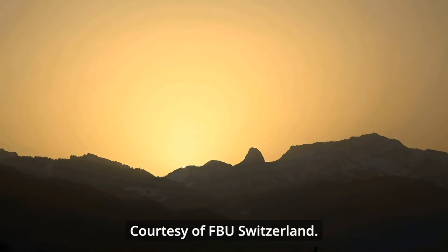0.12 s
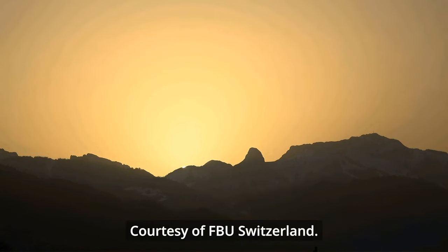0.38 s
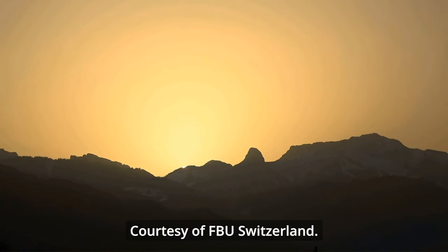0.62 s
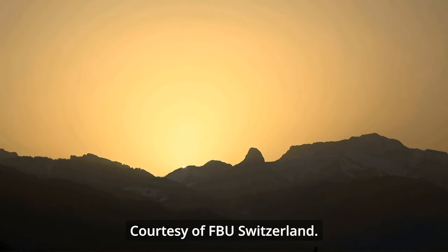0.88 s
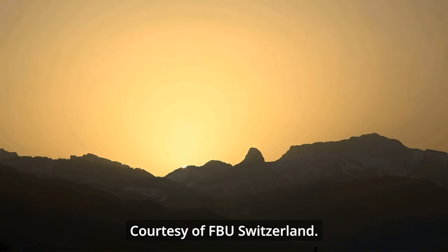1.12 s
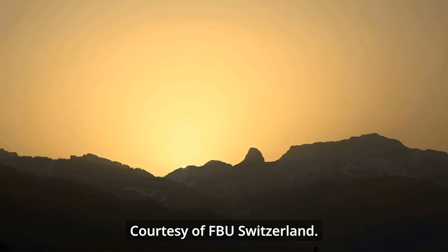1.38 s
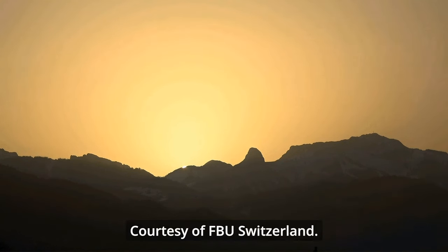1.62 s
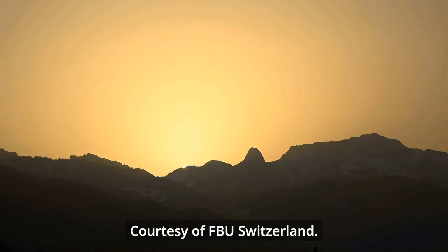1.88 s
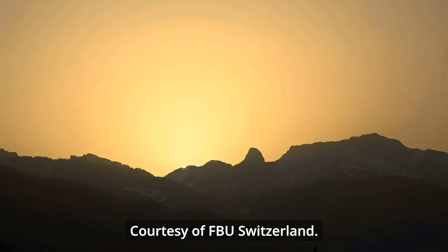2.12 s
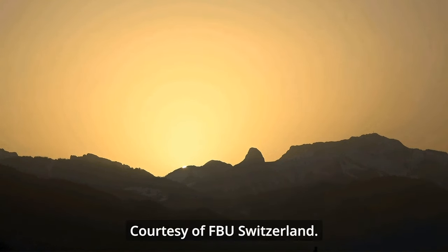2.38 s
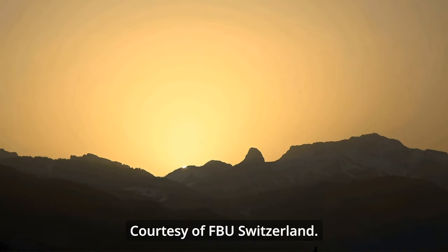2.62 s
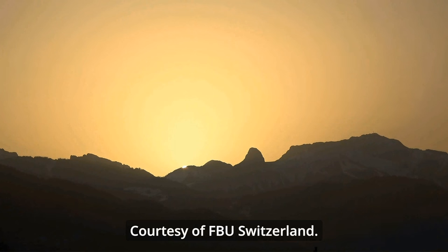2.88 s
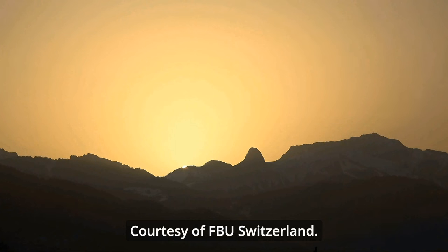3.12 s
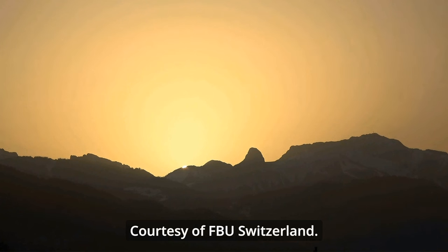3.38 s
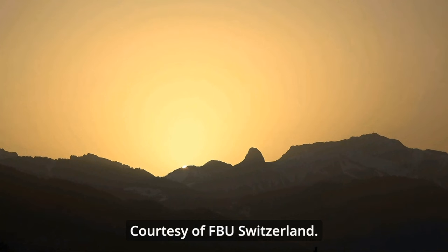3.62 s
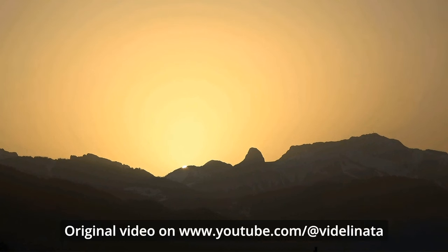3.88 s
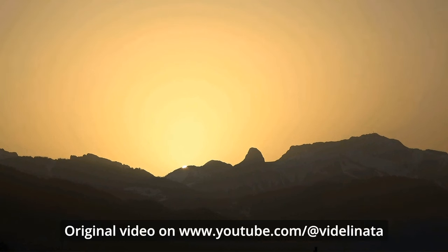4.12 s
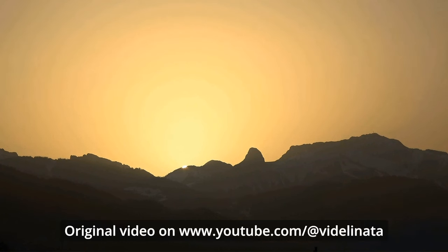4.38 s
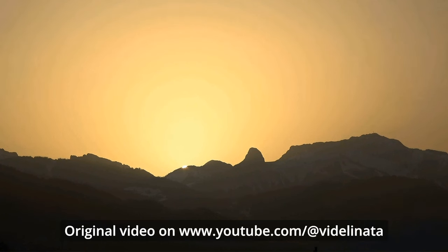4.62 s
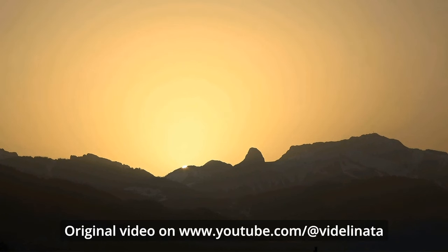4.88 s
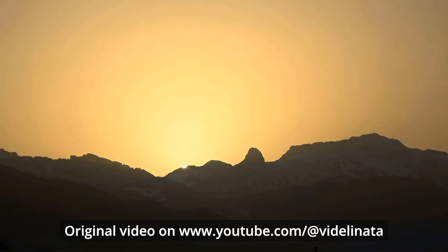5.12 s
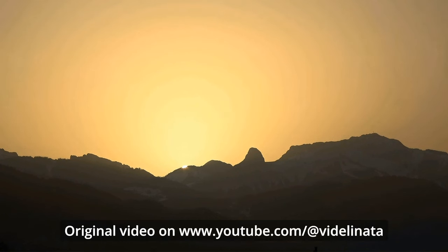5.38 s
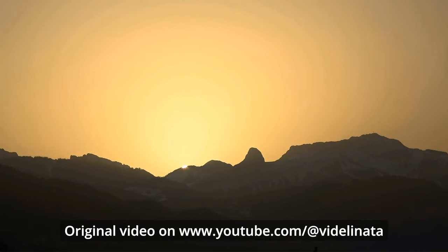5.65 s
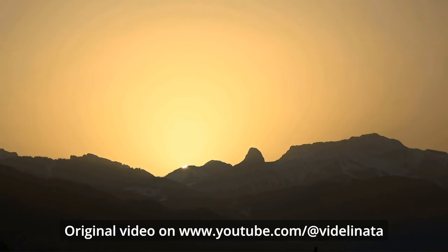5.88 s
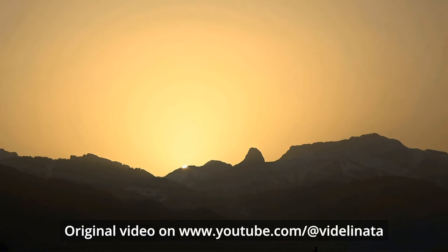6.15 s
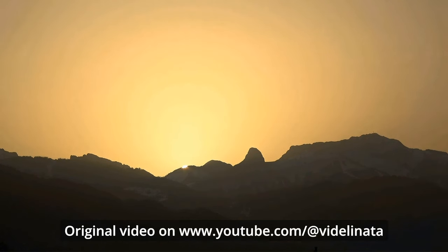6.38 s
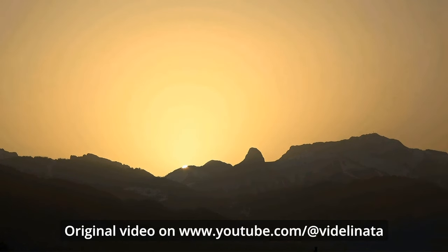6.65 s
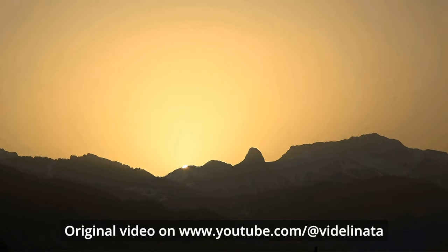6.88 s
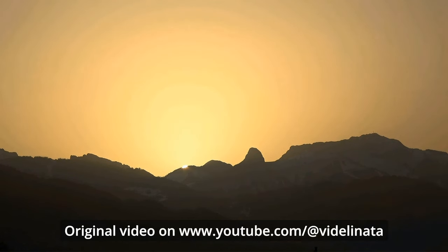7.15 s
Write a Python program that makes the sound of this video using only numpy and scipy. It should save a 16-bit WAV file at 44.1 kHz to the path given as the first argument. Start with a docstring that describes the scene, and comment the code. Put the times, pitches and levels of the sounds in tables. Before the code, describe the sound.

A dawn chorus on a wooded mountain slope, heard for about seven seconds through one microphone, the same in both channels. Strong gliding whistles around 3 kHz burst out from 0 to 0.3 s, with thin, high rippling notes and wheezing buzzes through the first second. From about 1.2 to 1.8 s the foreground is sparse, leaving faint whistles and distant birds. Around 2 s, quick chirps and notes whipping upward appear, then steep falling calls at 2.5 and 3.4 s. From 2.8 s a rich, low singer close by warbles near 2 kHz. A rapid twitter flashes by at 4.1 s. From 4.6 s whistles, smooth fluted phrases and buzzes overlap densely, with more low warbling around 6.3 s and bright whistles at 7 s. Short woodland echoes blur the calls. A hazy far chorus, faint steady low hum and gentle hiss run throughout; the birds are still singing when it stops.

```python
"""Dawn chorus on a wooded slope, seven seconds under a single microphone; gliding sine tones make the birds.
Whistles open it, with high ripples and wheezing buzzes (fast pitch swings) inside the first second or so.
Chirps, whipped hooks and steep falls come around 2 s; from 2.8 s a rich low singer close by warbles and flutes.
A twitter flashes by at 4.1 s, then whistles crowd in to the end. Throughout, trunks and ground scatter notes into
short noise tails, over a wash of far singers (random slurs), faint mains hum and hiss."""
import sys
import numpy as np
from scipy import signal
from scipy.fft import rfft, irfft, next_fast_len
from scipy.io import wavfile
from scipy.ndimage import uniform_filter1d, map_coordinates

SR = 44100
rng = np.random.default_rng(int(sys.argv[2]) if len(sys.argv) > 2 else 0)


def dump(signal):
    """Clip the signal to [-1, 1] and save it as 16-bit WAV at the path in sys.argv[1]."""
    limited = np.clip(np.atleast_2d(signal).T, -1, 1)
    pcm = np.round(limited * 32767).astype(np.int16)
    wavfile.write(sys.argv[1], SR, pcm)


def volts_from_decibels(level):
    """Turn decibel levels (scalar or array-like) into linear amplitude factors."""
    exponent = np.asarray(level, float) / 20
    return 10 ** exponent


N = 320166

# Voice levels are those of the direct sound, ahead of echoes.
# whistled notes with a freely drawn pitch and level curve, near and far, one list each: [t/s, f/Hz, level/dB]
FREE_WHISTLES = [
    [(0, 3143, -27), (0.008, 2858, -43.5), (0.035, 3193, -42.5), (0.058, 3080, -51.5), (0.066, 2820, -52)],
    [(0.119, 3350, -43), (0.138, 3643, -32), (0.152, 3536, -30), (0.162, 2820, -36.5), (0.174, 2834, -33),
     (0.198, 3480, -32.5), (0.214, 3520, -41.5), (0.223, 2853, -29.5), (0.232, 2820, -37.5),
     (0.258, 2880, -39)],
    [(1.29, 1960, -67.5), (1.37, 1895, -72), (1.46, 1994, -63.5), (1.485, 2286, -59), (1.635, 2248, -71.5)],
    [(3.683, 3100, -51), (3.687, 3800, -41), (3.69, 3620, -58), (3.694, 3920, -41), (3.7, 3030, -52),
     (3.706, 4070, -48.5), (3.74, 4220, -57)],
    [(3.86, 2960, -56), (3.876, 3250, -52), (3.883, 2830, -48.5), (3.898, 4820, -58)],
    [(4.001, 6970, -65), (4.024, 7000, -70), (4.035, 5270, -72), (4.05, 6280, -73)],
    [(4.518, 3360, -57), (4.54, 3560, -54), (4.555, 3420, -56), (4.574, 2700, -57)],
    [(4.696, 3990, -43.5), (4.705, 3700, -34.5), (4.722, 3548, -35.5), (4.85, 3520, -34.5),
     (4.91, 3570, -43.5), (4.95, 3580, -53)],
    [(4.73, 2040, -64.5), (4.75, 2580, -62), (4.795, 2780, -61)],
    [(4.866, 4500, -48.5), (4.89, 4550, -42.5), (5.088, 4210, -52.5)],
    [(4.982, 2530, -57), (5.03, 2670, -46.5), (5.056, 2650, -47.5), (5.075, 2846, -41),
     (5.111, 3030, -47.5), (5.16, 3800, -39.5)],
    [(5.17, 3640, -48), (5.22, 3780, -43.5), (5.29, 3570, -58), (5.365, 3790, -56)],
    [(5.37, 4020, -61), (5.41, 4050, -50), (5.452, 4680, -41), (5.5, 4570, -58)],
    [(5.59, 6660, -56.5), (5.635, 5780, -55.5), (5.692, 5810, -49), (5.732, 5070, -58.5),
     (5.759, 5850, -58)],
    [(5.681, 2567, -61), (5.735, 2970, -48.5), (5.775, 3730, -42), (5.8, 4170, -62), (5.825, 4220, -46.5),
     (5.85, 4065, -54), (5.875, 3570, -37.5), (5.897, 2940, -65)],
    [(6.276, 3560, -39.5), (6.288, 3810, -48.5), (6.33, 3700, -59)],
    [(6.972, 2686, -40.5), (6.99, 3286, -37.5), (7.029, 3590, -60)],
    [(7.106, 3010, -45.5), (7.125, 3324, -33), (7.16, 3364, -41.5), (7.259, 3294, -32.5)],
]
# slurs that sink a little: [start t/s, length/s, from f/Hz, to f/Hz, start level/dB]
SINKING_SLURS = [(0, 0.044, 3850, 3530, -50.5), (0.016, 0.032, 4430, 4570, -57),
                 (0.611, 0.0083, 3400, 4320, -48.5), (2.17, 0.017, 4760, 4330, -45),
                 (2.265, 0.074, 3120, 2900, -65), (2.331, 0.042, 4620, 4910, -48),
                 (2.982, 0.027, 4750, 4910, -55.5), (3.719, 0.025, 3500, 3300, -52.5),
                 (3.838, 0.014, 4700, 4820, -53.5), (4.218, 0.0056, 3780, 3400, -50),
                 (4.594, 0.019, 2650, 2810, -53.5), (4.633, 0.022, 2820, 2530, -53),
                 (4.908, 0.017, 2620, 2630, -46), (5.464, .04, 5630, 5570, -57),
                 (5.628, 0.097, 6490, 6600, -54), (5.754, 0.034, 2780, 2600, -48),
                 (6.069, 0.041, 3260, 3050, -55), (6.9, 0.013, 3230, 2920, -55),
                 (6.275, 0.054, 2720, 2540, -49)]
# slurs that swell slightly to their end: [start t/s, length/s, from f/Hz, to f/Hz, end level/dB]
SWELLING_SLURS = [(0.511, 0.0075, 3200, 4470, -53.5), (0.561, 0.0102, 3010, 4080, -54.5),
                  (.718, .018, 3520, 3890, -46.5), (1.056, 0.035, 3260, 3230, -63),
                  (1.599, 0.13, 3236, 3220, -68.5), (2.162, 0.023, 3668, 4360, -52.5),
                  (3.02, 0.026, 3410, 3280, -59), (3.776, 0.079, 2680, 2980, -60.5),
                  (3.832, 0.0086, 5600, 5500, -54), (3.9, 0.0085, 2750, 4730, -51),
                  (5.33, 0.0105, 2580, 3300, -53.5), (5.531, 0.058, 3275, 3215, -52.5),
                  (5.65, 0.091, 3350, 3090, -53), (6.151, 0.18, 1833, 1830, -60.5),
                  (6.18, 0.092, 3280, 2990, -57.5), (6.474, 0.018, 2690, 3380, -46),
                  (6.609, 0.046, 2990, 3180, -53.5), (6.731, 0.09, 3160, 3240, -55),
                  (6.763, 0.031, 4030, 3530, -54.5), (6.783, 0.03, 4030, 4290, -59),
                  (6.81, 0.05, 2780, 2604, -51.5), (6.864, 0.022, 4410, 3110, -50.5),
                  (6.963, .022, 3520, 4460, -44), (7.075, 0.047, 3590, 4330, -47.5),
                  (7.106, 0.053, 3630, 4060, -52.5)]
# quick bends that turn back to their start pitch: [start t/s, length/s, edge f/Hz, turn f/Hz, turn level/dB]
PITCH_BENDS = [(1.835, 0.013, 3290, 3790, -49.5), (2.02, 0.019, 3200, 3740, -49),
               (3.315, 0.079, 2950, 3113, -57), (4.034, 0.042, 3067, 3560, -57.5),
               (4.244, .045, 2270, 2580, -60.5), (5.501, 0.044, 2700, 2850, -55.5),
               (6.999, 0.014, 3300, 3720, -41.5)]
# steep falls that settle on a held pitch: [start t/s, from f/Hz, held f/Hz, settling time/s, peak level/dB]
STEEP_FALLS = [(2.452, 8000, 6950, 0.07, -59.5), (2.62, 6500, 5100, 0.0095, -47.5),
               (3.285, 8260, 6580, 0.044, -55.5), (3.455, 6040, 4836, 0.0062, -44.5)]
# shape of a chirp, flick up, dip, short hold: [t after start/s, ratio to base pitch, level over base/dB]
CHIRP_SHAPE = [(0, 0.75, -21), (0.0117, 1.28, 4.5), (.021, .84, -15), (.029, .99, 0.8), (0.058, 1.03, -7.5)]
# the chirps: [start t/s, base f/Hz, base level/dB]
CHIRP_CALLS = [(1.834, 2230, -41.5), (2.019, 2243, -40)]
# a low note whips up to a high one that fades: [start t/s, low note/s, low f/Hz, high f/Hz, low level/dB]
WHIPPED_HOOKS = [(2.178, 0.009, 2400, 5140, -48), (2.331, 0.022, 2480, 5840, -47.5)]
# U-shaped notes, steep strokes around a flat floor:
# [start t/s, length/s, mean edge f/Hz, floor f/Hz, level at the throat resonance/dB]
TWITTER_STROKES = [(4.053, .015, 4900, 4350, -46), (4.075, .023, 4600, 3750, -48),
                   (4.103, .024, 4350, 3200, -47), (4.131, .0285, 4350, 2850, -46),
                   (4.1615, .029, 4300, 2450, -46), (4.1925, .022, 4200, 3380, -50)]
# thin high rippling notes of a small bird: [start t/s, end t/s, start f/Hz, end f/Hz, start level/dB]
RIPPLED_NOTES = [(0.058, 0.12, 7820, 7530, -64.5), (0.138, 0.202, 7090, 6720, -57.5),
                 (0.289, 0.358, 7580, 7240, -64), (0.375, 0.447, 6600, 6480, -63.5),
                 (0.513, 0.612, 7230, 7170, -62.5), (0.78, 0.865, 6860, 6970, -64.5)]
# low warbled notes of the rich singer close by: [t/s, centre f/Hz, level/dB, pitch swing/Hz]
LOW_WARBLES = [
    [(2.797, 1510, -57, 12), (2.825, 1866, -53, 34), (2.9, 1902, -55.5, 65), (3.035, 1977, -54, 75),
     (3.056, 1970, -45, 10), (3.074, 1550, -51, 10)],
    [(3.19, 2240, -45, 19), (3.205, 2420, -42, 14), (3.243, 2315, -38, 12), (3.272, 1906, -42.5, 63),
     (3.414, 1984, -42, 55), (3.439, 1850, -45.5, 100)],
    [(3.494, 1936, -43, 40), (3.56, 1835, -40, 90), (3.595, 1710, -47, 160)],
    [(4.88, 1870, -49.5, 130), (4.936, 2022, -46, 272), (5.069, 2106, -46, 346)],
    [(5.941, 2400, -72, 150), (5.968, 2382, -47, 80), (6.03, 2337, -46, 60)],
    [(6.275, 2130, -55, 32), (6.3, 2045, -47, 31), (6.41, 1858, -44, 130), (6.47, 1892, -42.5, 61),
     (6.5, 1986, -41.5, 23.2), (6.539, 2060, -46, 35)],
    [(6.495, 1788, -48.5, 60), (6.596, 1730, -50, 59.6)],
    [(6.6, 2285, -61, 300), (6.621, 2410, -46.5, 234), (6.669, 2196, -44.5, 220)],
]
# one row for each warble: [swings per second/Hz, level flutter 0-1]
WARBLE_SWINGS = [(73.9, 1), (76.8, 0.19), (69.5, 0), (101, 0), (74, 1), (39.9, 0.34), (47.3, 0.76),
                 (68.5, 0)]
# fluted notes of the same singer: [t/s, f/Hz, level/dB]
FLUTED_NOTES = [
    [(2.801, 1055, -68), (2.84, 1235, -65), (3.019, 1291, -60.5), (3.058, 1230, -63)],
    [(4.602, 1740, -49.5), (4.663, 2070, -42.5), (4.698, 1950, -55)],
    [(4.771, 1730, -46.5), (4.84, 2077, -42.5), (4.879, 1844, -55)],
    [(5.141, 2470, -39.5), (5.2, 2126, -47.5), (5.285, 2400, -36.5), (5.33, 2330, -39), (5.359, 2170, -47)],
    [(5.69, 1600, -61.5), (5.75, 1907, -56), (5.81, 2044, -57), (5.853, 1943, -58.5), (5.889, 1405, -66)],
    [(6.031, 2350, -40), (6.072, 2556, -41), (6.16, 2408, -41)],
    [(6.671, 1944, -44.5), (6.709, 1570, -48.5), (6.75, 1654, -48.5), (6.769, 1300, -56.5)],
]
# octave of a fluted note, stronger on low notes: [first f/Hz, level/dB relative to the tone]
FLUTE_OCTAVE = [(1100, -4.5), (1500, -38)]
# In the buzzes the nominal swing is a scale that the trill multiplies.
# wheezes that change shape: [t/s, centre f/Hz, level/dB, nominal swing/Hz]
SHAPED_WHEEZES = [
    [(0.558, 4620, -50.5, 500), (0.588, 6210, -50, 403), (0.622, 6450, -49, 300), (0.65, 4540, -53, 250),
     (0.668, 4550, -47, 250), (0.68, 5460, -53, 400), (0.72, 5140, -55, 600)],
    [(0.88, 6350, -58.5, 605), (0.944, 6630, -59, 318), (1.184, 5960, -60.5, 750), (1.299, 5950, -69, 484)],
    [(5.11, 4140, -50, 200), (5.19, 4134, -46.5, 220), (5.26, 3975, -50, 250), (5.33, 3970, -64, 302)],
]
# straight wheezy slides: [start t/s, length/s, from f/Hz, to f/Hz, start level/dB, nominal swing/Hz]
WHEEZY_SLIDES = [(0.256, .185, 2558, 1985, -61.5, 265), (0.745, 0.051, 5250, 5360, -58.5, 300),
                 (0.74, .04, 4250, 3930, -51.5, 400), (2.195, 0.054, 5300, 5200, -58, 346),
                 (2.977, 0.023, 5470, 5200, -56.5, 700), (3.211, 0.054, 6320, 7940, -65, 505),
                 (3.843, 0.044, 5180, 5340, -58, 770), (5.346, 0.105, 5250, 5040, -56.5, 350),
                 (4.085, 0.052, 7800, 7850, -67.5, 120), (4.96, .14, 3620, 3735, -50, 168),
                 (4.999, 0.12, 5020, 5830, -62, 246), (5.582, 0.064, 7150, 7250, -65, 600),
                 (5.848, 0.26, 7590, 6100, -64.5, 610)]
# scratchy ticks of a far bird, one short wide wheeze each: [t/s, level/dB]
SCRATCHY_TICKS = [(5.195, -59), (5.258, -59), (5.415, -59), (4.6, -58.5), (2.455, -60)]
# short buzzes that reach a pitch, then trail off wider:
# [start t/s, time to reach/s, from f/Hz, reached f/Hz, level there/dB, nominal swing there/Hz]
SHORT_ZIPS = [(2.784, .1, 6820, 6030, -56.5, 330), (3.62, 0.12, 6840, 6000, -57, 337),
              (4.21, .035, 7300, 7770, -57, 200), (4.431, 0.036, 7500, 7840, -52, 180)]
# level of the far singers with their echo: [t/s, level/dB]
CHORUS_LEVEL = [(0, -58.5), (.6, -62.5), (1.3, -65.5), (2.2, -58.5), (3, -60.5), (4.4, -61), (5.2, -59),
                (6.2, -61.5), (7.26, -53.5)]
# pitch range of the far singers: [f/Hz, relative level/dB]
CHORUS_RANGE = [(1400, -11), (1800, 5), (2100, 9.5), (2700, 5.5), (3400, 10.5), (4000, 1), (4700, -7),
                (6000, -39)]
# air and preamplifier hiss: [f/Hz, relative density/dB per Hz]
HISS_SPECTRUM = [(20, -14.5), (40, -6), (250, -2), (700, -3), (1400, -5.5), (4000, -7.5), (10000, -17),
                 (14100, -21.5), (14800, -44)]
# mains hum: [f/Hz, mean level/dB rms]
MAINS_HUM = [(100, -81), (150, -79.5)]
# decay of the woodland echo: [f/Hz, t60/s]
WOOD_DECAY = [(1500, 0.5), (4000, 0.47), (8000, 0.34)]
# echo relative to the direct sound: [whistlers level/dB, low singer level/dB, buzzers level/dB]
ECHO_SEND = (-10, -10.5, -2.5)


def whistles():
    """Gliding notes heard through foliage; for a second those from an open perch come through unbroken."""
    leafy, open_perch = np.zeros(N), np.zeros(N)
    for note in whistled_notes():
        exposed = 3.66 < note[0][0] < 4.6  # start of the note in s
        track = open_perch if exposed else leafy
        sing(track, note, fade_s=.002, overtone_db=-44, round_s=.004, shake=None if exposed else broken)
    return branches(leafy) + open_perch


def whistled_notes():
    """Every whistle as rows (t/s, f/Hz, level/dB), from the pitch and level curve of its kind."""
    notes = list(FREE_WHISTLES)
    for s, length, start_hz, end_hz, db in SINKING_SLURS:
        notes.append([(s, start_hz, db), (s + length, end_hz, db - 3.5)])
    for s, length, start_hz, end_hz, db in SWELLING_SLURS:
        notes.append([(s, start_hz, db - 0.5), (s + length, end_hz, db)])

    u = np.linspace(0, 1, num=7)
    from_turn = 2 * u - 1
    for s, length, edge, turn, db in PITCH_BENDS:
        hz = turn + (edge - turn) * abs(from_turn) ** 3.2  # higher power: flatter turn, steeper sides
        notes.append(np.transpose([s + length * u, hz, db + 0.5 * from_turn ** 2]))

    fall_s, peak_s = 0.135, 0.062
    t = fall_s * u ** 2  # rows crowd towards the steep start
    fall_db = np.interp(t, [0, peak_s, fall_s], [-9.5, 0, -28])
    for s, start_hz, held, settle_s, db in STEEP_FALLS:
        hz = held + (start_hz - held) * np.exp(-t / settle_s)
        notes.append(np.transpose([s + t, hz, db + fall_db]))

    for s, hz, db in CHIRP_CALLS:
        notes.append([(s + dt, hz * ratio, db + rel) for dt, ratio, rel in CHIRP_SHAPE])

    whip_s, hold_s = 0.0096, 0.057
    for s, low_s, low, high, db in WHIPPED_HOOKS:
        whip = s + low_s
        top = whip + whip_s
        notes.append([(s, low, db - 6), (whip, low, db),
                      (whip + whip_s / 2, (low + high) / 2, db - 5),  # the voice thins halfway up
                      (top, high, db - 3), (top + hold_s, high * 1.04, db - 13)])
    return notes


def broken(t, swing):
    """Paths through leaves and branches beat: short notes splinter, held ones throb more slowly."""
    brief = min(1, 0.0633 / t[-1])
    bend_hz = 50 * brief * wobble(154.0, count=len(t))
    return bend_hz, unit(1 + .4 * wobble(70 + 250 * brief, count=len(t)))


def branches(x, count=7):
    """Nearby trunks return distinct copies within 40 ms, so steep chirps split into several strokes."""
    out = x.copy()
    for u in rng.random(count):
        out = add(out, volts_from_decibels(-9 - 8 * u) * x, round((.004 + .036 * u) * SR))  # later copies are weaker
    return out


def twitter():
    """Each stroke flashes out as it sweeps through the resonance of the throat."""
    throat_hz, loss_db_per_khz = 3750, 15
    track, u = np.zeros(N), np.linspace(-1, 1, num=41)
    for s, length, edge, low, db in TWITTER_STROKES:
        # steep sides, and a floor that climbs by 0.13 of the depth either side of its middle
        hz = low + (edge - low) * (abs(u) ** 4.5 + 0.13 * u)
        level_db = db - loss_db_per_khz * abs(hz - throat_hz) / 1000
        rows = np.transpose([s + length * (u + 1) / 2, hz, level_db])
        sing(track, rows, fade_s=.0006, overtone_db=-44, round_s=.0005, shake=broken)
    return track


def ripples():
    """Each note rises from its low point and swings ever less widely."""
    swing_hz, calm_s, rate_hz = 555, 0.11, 29.2

    def ripple(t, swing):
        return -swing_hz * np.exp(-t / calm_s) * np.cos(2 * np.pi * rate_hz * t), 1

    track = np.zeros(N)
    for start, end, hz, end_hz, db in RIPPLED_NOTES:
        rows = [(start, hz, db), (end, end_hz, db + 0.5)]
        sing(track, rows, fade_s=0.0069, overtone_db=-58, shake=ripple)
    return track


def warbles():
    """The pitch swings almost regularly; where the level flutters it peaks once a swing, more on wide swings."""
    track = np.zeros(N)
    for note, (rate, depth) in zip(LOW_WARBLES, WARBLE_SWINGS):
        def beat(t, swing):
            turn = 2 * np.pi * rate * t + .25 * wobble(40, count=len(t))
            flutter = np.clip(depth * swing / swing.mean(), 0, 1)
            return swing * np.sin(turn), unit(1 + flutter * np.cos(turn))
        sing(track, note, fade_s=0.0073, overtone_db=-57, shake=beat)
    return track


def flutes():
    """Smooth arched whistles in clear view; low notes carry a stronger octave."""
    track = np.zeros(N)
    for note in FLUTED_NOTES:
        sing(track, note, fade_s=.004, overtone_db=along(FLUTE_OCTAVE, note[0][1]), round_s=.03)
    return track


def buzzes():
    """Tiny uneven pitch sweeps, about 280 a second, smear into a wheeze."""
    def trill(t, swing):
        count = len(t)
        turn = 2 * np.pi * np.cumsum(280 * (1 + 0.2 * wobble(80, count))) / SR
        sweep = np.tanh(0.81 * np.sin(turn) + 0.557 * wobble(400, count))
        flutter = unit(1 + 0.45 * np.cos(turn) + 0.36 * wobble(259.0, count))
        return 1.4 * swing * sweep, flutter

    track = np.zeros(N)
    for note in buzzed_notes():
        sing(track, note, fade_s=0.0099, overtone_db=-27.5, round_s=0.0072, shake=trill)
    return track


def buzzed_notes():
    """Every buzz as rows (t/s, f/Hz, level/dB, nominal swing/Hz)."""
    notes = list(SHAPED_WHEEZES)
    for s, length, start_hz, end_hz, db, swing in WHEEZY_SLIDES:
        notes.append([(s, start_hz, db, swing), (s + length, end_hz, db + 2, swing)])
    for s, db in SCRATCHY_TICKS:
        notes.append([(s, 5500, db, 700), (s + 0.0127, 6500, db, 700)])
    widens = 1.45  # the swing grows by this factor at each stage
    for s, reach_s, start_hz, hz, db, swing in SHORT_ZIPS:
        reached = s + reach_s
        notes.append([(s, start_hz, db - 3, swing / widens), (reached, hz, db, swing),
                      (reached + 0.051, hz, db - 14.5, swing * widens)])
    return notes


def far_chorus(count=1400):
    """Nearly two hundred short random slurs a second, blurred to a haze by their echoes."""
    track = np.zeros(N)
    for when, pitch, size, slope in rng.random((count, 4)):
        s, hz = when * N / SR, 1400 * 4 ** pitch
        length, db = .015 + .05 * size, 5 * size  # longer slurs are louder
        end_hz = hz * (1 + 0.295 * (slope - .5))
        sing(track, [(s, hz, db), (s + length, end_hz, db)], fade_s=.01, overtone_db=-70, shake=broken)
    track = coloured(track, CHORUS_RANGE)
    haze = unit(volts_from_decibels(-18.0) * track + wood(track, piece_s=.3, gap_s=.02))
    s, level_db = np.transpose(CHORUS_LEVEL)
    return haze * volts_from_decibels(np.interp(np.arange(N) / SR, s, level_db))


def floor():
    """Steady hiss with slightly unsteady mains tones."""
    t = np.arange(N) / SR
    hum = np.zeros(N)
    for hz, db in MAINS_HUM:
        level = np.sqrt(2) * volts_from_decibels(db + 0.6 * wobble(2.3, count=N))
        hum += level * np.sin(2 * np.pi * (hz * t + rng.random()))
    hiss = unit(coloured(rng.standard_normal(N), [(10, -120)] + HISS_SPECTRUM))
    return hum + volts_from_decibels(-65) * hiss


def wood(x, piece_s, gap_s):
    """Scattered echo; singers move and turn, so each short piece meets a new decaying noise tail."""
    out, step = np.zeros(N), round(piece_s * SR)
    window = np.hanning(2 * step + 1)[:-1]  # overlapping pieces add up to the whole
    padded = np.pad(x, (step, 2 * step))
    for start in range(0, N + step, step):
        hz, t, z = signal.stft(rng.standard_normal(SR // 2), SR, nperseg=256)
        decay = volts_from_decibels(-60 * t / along(WOOD_DECAY, hz)[:, None])
        tail = signal.istft(z * decay, SR, nperseg=256)[1]
        piece = padded[start:start + 2 * step] * window
        wet = signal.fftconvolve(piece, tail / np.linalg.norm(tail))
        out = add(out, wet, start - step + round(gap_s * SR))
    return out


def sing(track, rows, fade_s, overtone_db, round_s=0.01, shake=None):
    """Mixes in a syrinx tone following its rows, corners rounded; shake(t, swing) bends pitch and level."""
    s, hz, db, *swing = np.transpose(rows)
    t = np.arange(s[0] - fade_s, s[-1] + fade_s, 1 / SR)
    pitch = uniform_filter1d(np.interp(t, s, hz), round(round_s * SR), mode="nearest")
    to_end = np.minimum(t - t[0], t[-1] - t)
    fade = np.sin(np.pi / 2 * np.clip(to_end / (2 * fade_s), 0, 1)) ** 2
    gain = volts_from_decibels(np.interp(t, s, db)) * fade
    if shake:
        bend, flutter = shake(t - t[0], np.interp(t, s, swing[0]) if swing else 0)
        pitch, gain = pitch + bend, gain * flutter
    phase = 2 * np.pi * (np.cumsum(pitch) / SR + rng.random())
    tone = np.sqrt(2) * gain * (np.sin(phase) + volts_from_decibels(overtone_db) * np.sin(2 * phase))
    return add(track, tone, round(t[0] * SR))


def add(track, sound, start):
    """Mixes a sound into the track in place at a sample, trimmed to the track."""
    a, b = max(start, 0), min(start + len(sound), N)
    track[a:b] += sound[a - start:b - start]
    return track


def unit(x):
    """Scaled to rms 1."""
    return x / np.sqrt(np.mean(x ** 2) + 1e-20)


def along(points, hz):
    """(f/Hz, value) points read on a log frequency axis."""
    f, v = np.transpose(points)
    return np.interp(np.log(hz + 1), np.log(f + 1), v)


def coloured(x, spectrum):
    """x filtered through a (f/Hz, level/dB) spectrum."""
    m = next_fast_len(len(x) + 8192)  # padding keeps the end from wrapping onto the start
    gain = volts_from_decibels(along(spectrum, np.fft.rfftfreq(m, 1 / SR)))
    return irfft(rfft(x, m) * gain, m)[:len(x)]


def wobble(rate, count):
    """A smooth random curve, rate knots a second."""
    knots = rng.standard_normal(count // 40 + 8)
    return map_coordinates(knots, [np.arange(count) * rate / SR])


def scene():
    """The low singer sits closest and driest; the buzzers carry the strongest echo."""
    clear = whistles() + twitter() + ripples()
    near, rough = warbles() + flutes(), buzzes()
    sent = volts_from_decibels(np.array(ECHO_SEND)) @ [clear, near, rough]
    echo = wood(sent, piece_s=.12, gap_s=.004)
    mono = clear + near + rough + echo + far_chorus() + floor()
    return np.array([mono, mono])


def low_pass(x):
    """Removes everything above the highest recorded frequency."""
    return signal.sosfilt(signal.butter(12, 15380, fs=SR, output="sos"), x)


def record(dry):
    """One microphone, the same on both channels."""
    return low_pass(dry)


dry = scene()
out = record(dry)
dump(out)
```